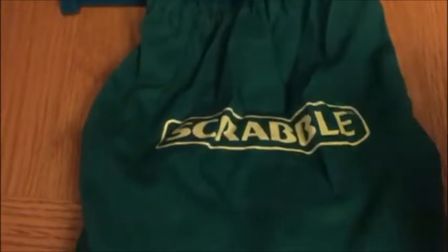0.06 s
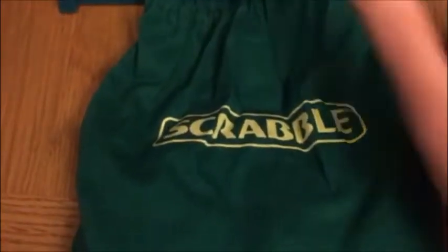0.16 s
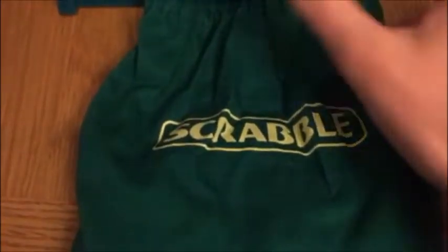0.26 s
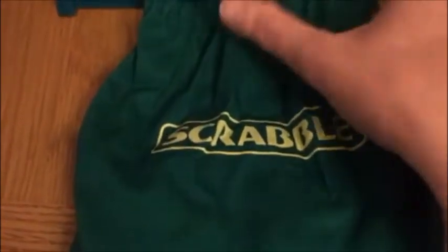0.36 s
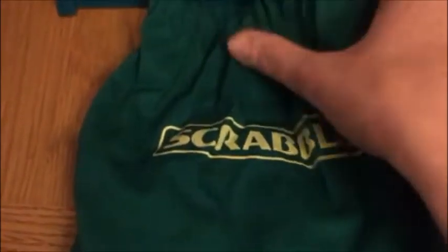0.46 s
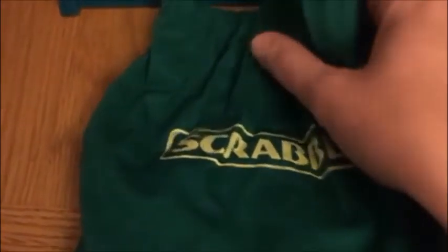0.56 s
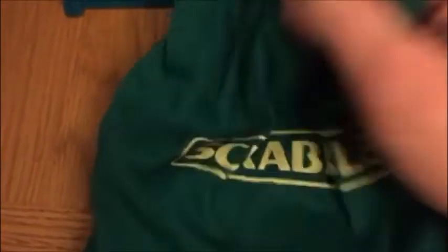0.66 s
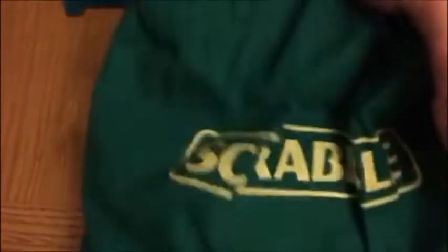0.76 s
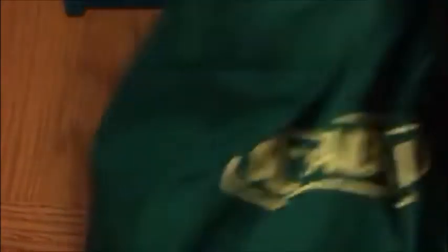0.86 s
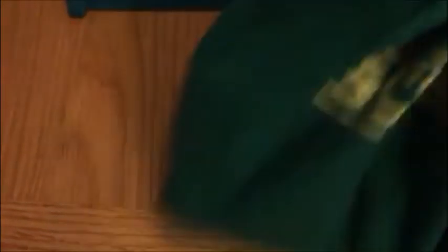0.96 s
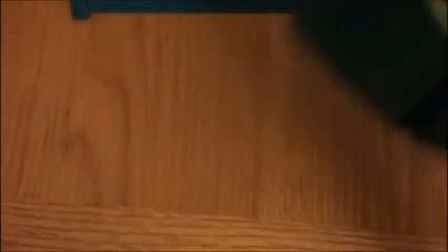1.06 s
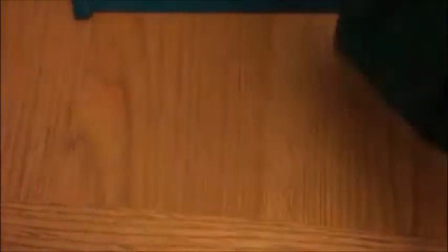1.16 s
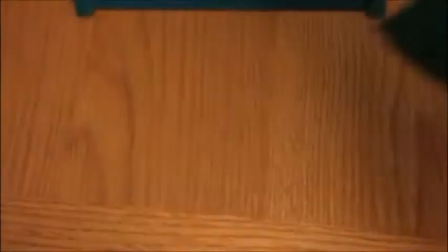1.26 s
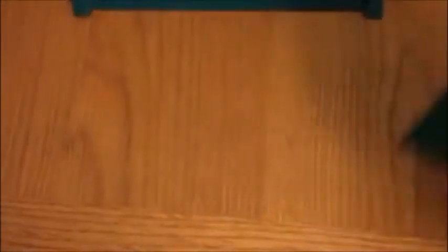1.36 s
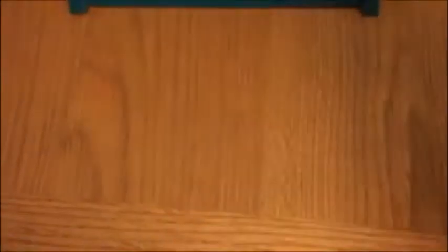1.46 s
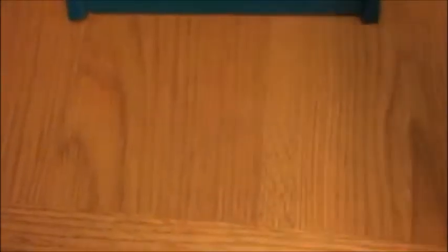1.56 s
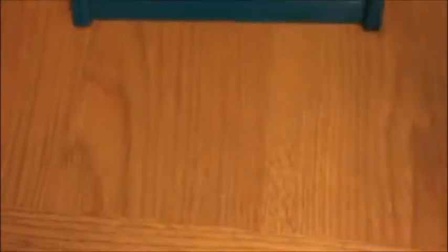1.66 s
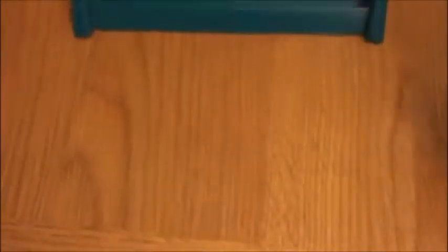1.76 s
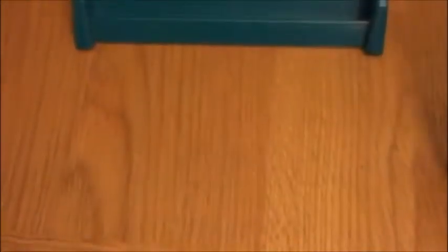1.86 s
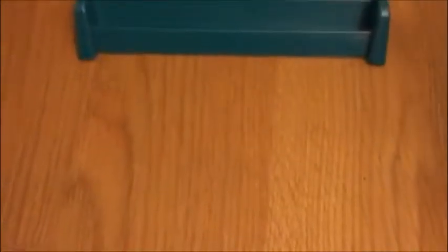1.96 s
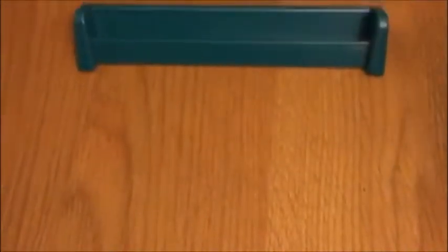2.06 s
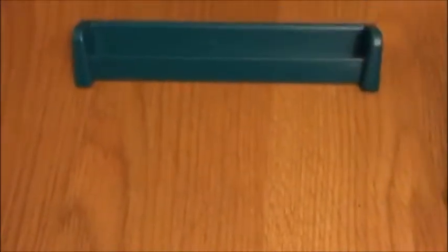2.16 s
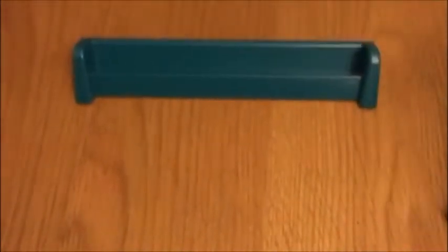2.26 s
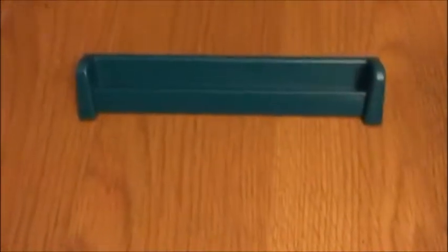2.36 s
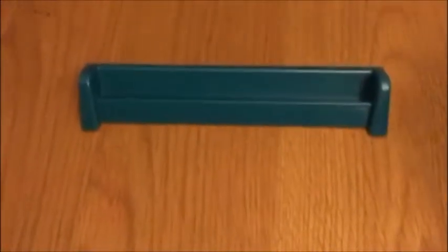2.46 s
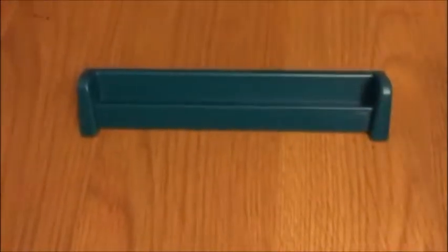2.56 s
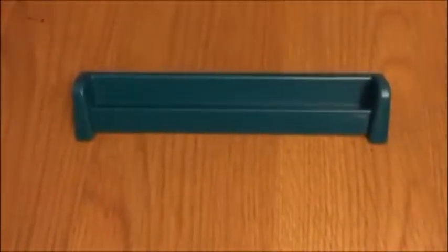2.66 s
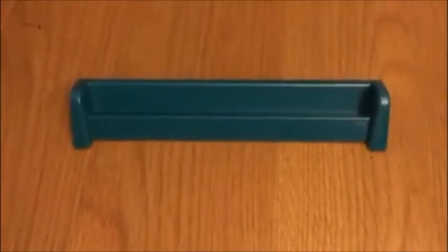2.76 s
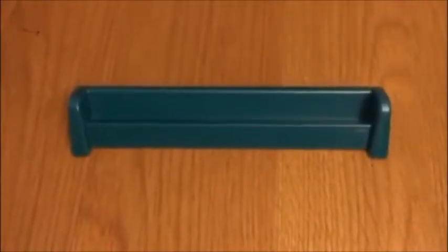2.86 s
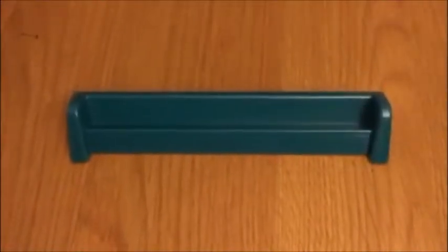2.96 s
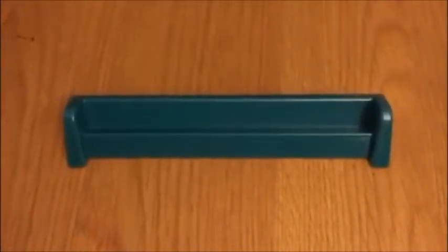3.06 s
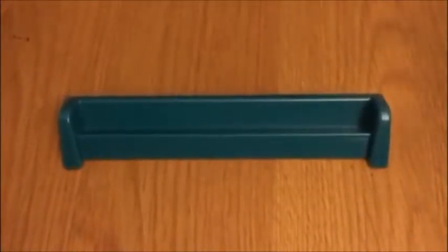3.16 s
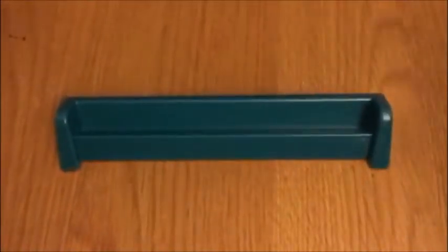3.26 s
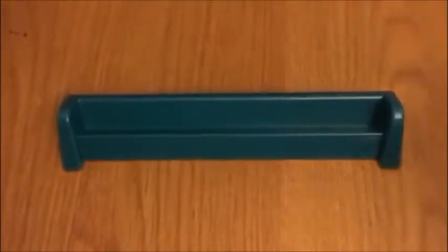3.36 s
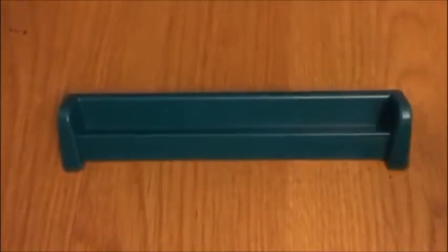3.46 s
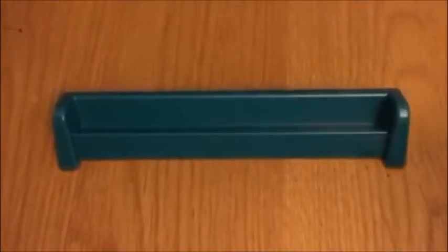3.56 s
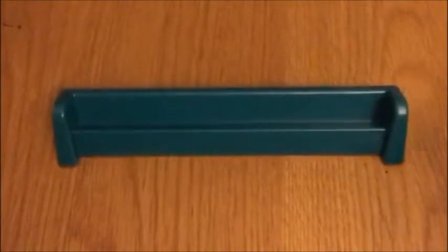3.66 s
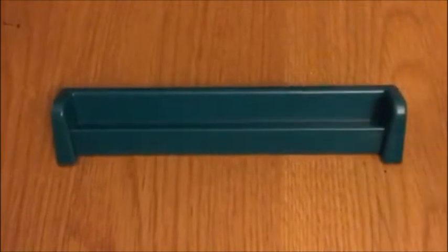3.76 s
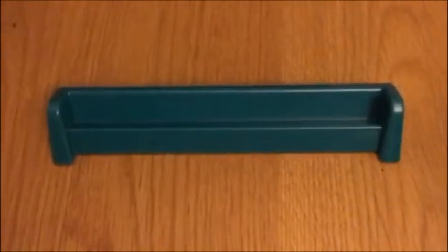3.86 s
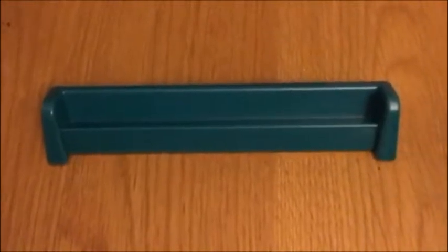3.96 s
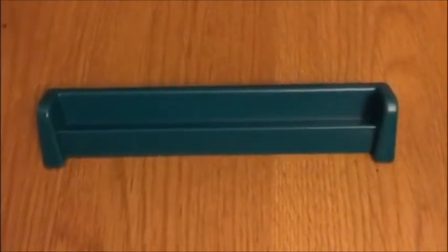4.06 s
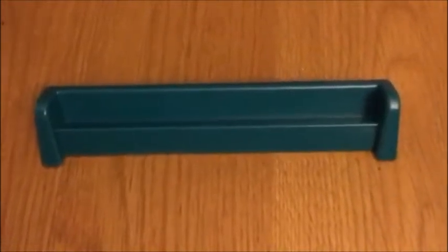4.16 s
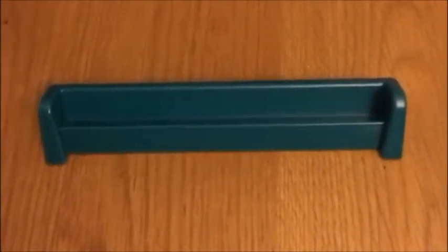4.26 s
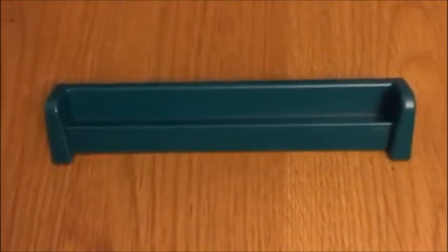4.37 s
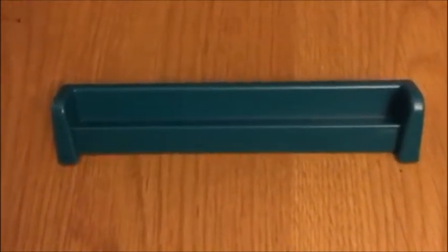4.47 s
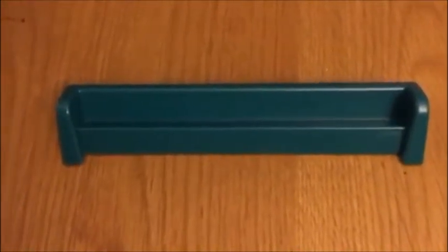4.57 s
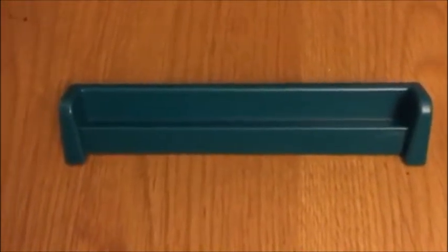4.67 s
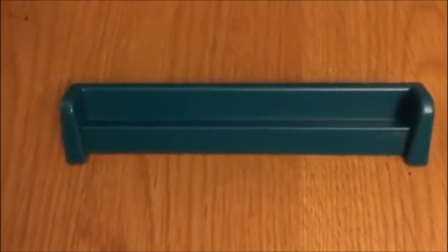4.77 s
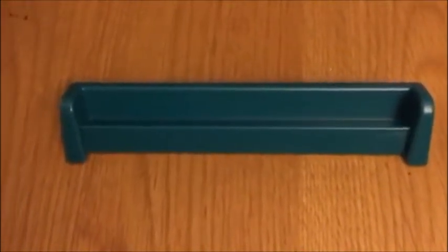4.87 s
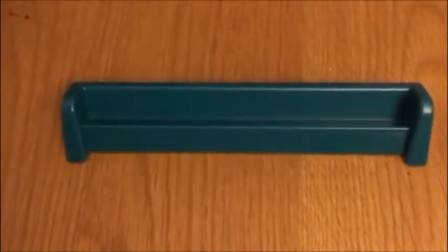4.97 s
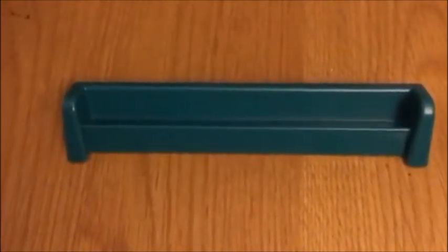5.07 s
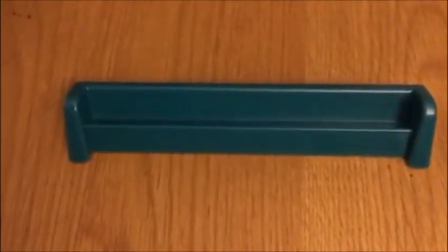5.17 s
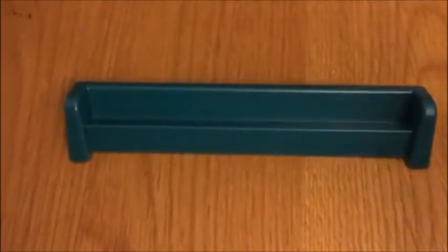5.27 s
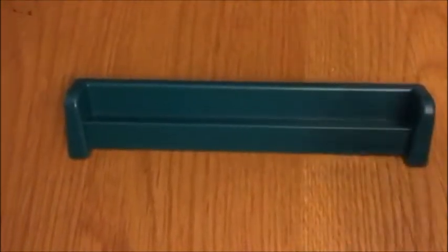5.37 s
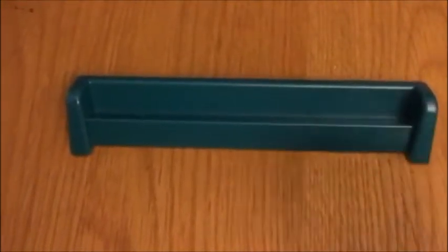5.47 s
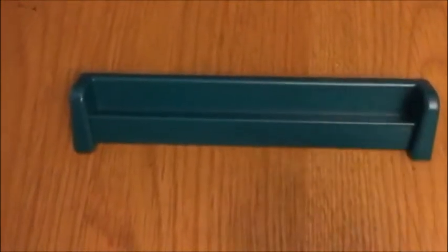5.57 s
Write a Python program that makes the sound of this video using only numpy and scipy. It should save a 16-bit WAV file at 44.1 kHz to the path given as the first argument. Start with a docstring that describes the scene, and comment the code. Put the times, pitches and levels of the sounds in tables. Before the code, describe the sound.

A small, quiet room with very faint, low steady air, heard from close by. At about 0.2 seconds a soft double bump is followed by a light hiss of cloth under a hand. From 0.75 wooden tiles begin to click in a bag, with a small cluster of crisp clacks around 1.0. From 1.25 to 1.9 the shaking is strongest: dense, bright, hard clatter in quick surges, loudest near 1.5 and again about 1.7, over low rumble, rustling fabric and dull thuds. A final knock comes near 2.0, then sparse, soft ticks until 2.9. Cloth slides again around 3.1; a second rattle rises at 3.25 and peaks with a sharp knock at 3.4. Looser, quieter groups of clacks follow near 3.9, 4.05, 4.3 and 4.6, thinning by 4.9. A low, soft thump at 5.1 and faint cloth close it. Echoes are short and dry.

```python
"""Bag of wooden game tiles

A cloth bag of tiles is picked up from a table and jostled in two spells, heard from close by.
Single clacks, each a knock with short rings, stand out of a clatter of many tiny collisions.
The clatter swells and settles with each shake, denser and harder at its height.
Shaped noise makes the rumbling heap, rustling cloth and sliding hiss; noise bursts and booms make the thuds.
A small quiet room answers with a table echo and a short tail, over faint steady air."""
import sys
import numpy as np
from scipy import signal
from scipy.fft import rfft, irfft
from scipy.io import wavfile
from scipy.ndimage import uniform_filter1d

SR = 44100
rng = np.random.default_rng(int(sys.argv[2]) if len(sys.argv) > 2 else 0)


def persist_wave(psi):
    """Save psi, clipped to +-1, as 16-bit WAV."""
    counts = np.round(np.clip(psi, -1, 1) * 32767).astype(np.int16)
    wavfile.write(sys.argv[1], SR, np.atleast_2d(counts).T)


N = 247180  # length in samples
HZ = np.fft.rfftfreq(N, 1 / SR)
TIME = np.arange(N) / SR
CLACK_TIME = np.arange(2048) / SR
ATTACK = round(.004 * SR)  # samples at the start of a clack that set its level


def gain_of(db):
    """Turns decibels into amplitude."""
    return 10 ** (np.asarray(db) / 20)


def evened(x, size=None):
    """Scales a sound to rms 1, over all of it or over its first samples."""
    return x / np.sqrt(np.mean(x[:size] ** 2) + 1e-20)


def read(points, hz):
    """Reads a curve between its points, on a log-frequency axis."""
    f, value = np.transpose(points)
    return np.interp(np.log(hz + 1), np.log(f), value)


def add(mix, s, sound):
    """Adds a sound into the mix at a time in seconds."""
    part = mix[round(s * SR):][:len(sound)]
    part += sound[:len(part)]


def coloured(x, points):
    """Filters to the given spectrum without smearing backwards in time, so that attacks stay sharp."""
    log_gain = np.log(gain_of(read(points, abs(np.fft.fftfreq(N, 1 / SR)))))
    response = np.exp(np.conj(signal.hilbert(log_gain)))  # gain with its minimum phase
    return irfft(rfft(x) * response[:len(HZ)], N)


def burst(t, hz, decay, spread):
    """A short shudder of noise in one broad resonance."""
    edges = np.clip([hz / (1 + spread), hz * (1 + spread)], 20, .45 * SR)
    b, a = signal.butter(1, edges, "band", fs=SR)
    return signal.lfilter(b, a, rng.standard_normal(len(t)) * np.exp(-t / decay))


def swells(rows, drop_db, roundness=1.25):
    """Level in dB of movements that build up, peak and settle; overlapping ones add in power."""
    power = np.full(N, 1e-16)
    for s, db, build, settle in rows:
        away = np.maximum((s - TIME) / build, (TIME - s) / settle)
        near = abs(away) < 4
        # down by drop_db one build-up before or one settling after; roundness above 1 rounds the top
        power[near] += gain_of(db - drop_db * abs(away[near]) ** roundness) ** 2
    return 10 * np.log10(power)


# Spectrum of the air in the room. Each row: frequency in Hz, relative level in dB per Hz.
ROOM_AIR = [(25, -13.5), (60, -3.5), (105, 0), (150, -4.5), (300, -7), (550, -12), (1300, -11.5),
            (2200, -19), (4000, -27.5), (16000, -34.5)]


def room_air(level_db=-70.5):
    """Steady noise, strongest in the bass, is the faint air of the room."""
    return gain_of(level_db) * evened(coloured(rng.standard_normal(N), ROOM_AIR))


# Cloth slides under the hand.
# Each row: time of its height in seconds, hiss level in dB, build-up in seconds, settling in seconds.
SLIDES = [(0.61, -68.5, 0.24, 0.63), (3.07, -72, 0.2, 0.32), (3.72, -77, 0.13, 0.36),
          (5.15, -79.5, .6, 0.28)]
# Spectrum of the hiss of sliding cloth. Each row: frequency in Hz, relative level in dB per Hz.
HISS = [(500, -9.5), (2500, 4), (7000, -9.5), (15000, -7.5)]


def slides(drop_db=20):
    """The soft, even hiss of cloth sliding under the hand."""
    return gain_of(swells(SLIDES, drop_db)) * evened(coloured(rng.standard_normal(N), HISS))


# Shakes, each a surge of the heap. Each row: time of its height in seconds, clatter in dB, rumble in dB
# (both before trims), build-up in seconds, settling in seconds.
SHAKES = [(0.774, -42, -57, 0.081, 0.16), (0.986, -40, -57.5, 0.072, 0.042),
          (1.041, -39.5, -58.5, 0.033, .051), (1.226, -47.5, -63, 0.13, 0.12),
          (1.264, -28.5, -51, .04, .036), (1.426, -30, -49.5, 0.044, 0.088),
          (1.479, -21, -47.5, 0.025, 0.044), (1.63, -26, -65.5, 0.031, 0.061),
          (1.698, -24, -62, 0.048, 0.078), (1.866, -33, -57.5, 0.081, 0.05), (1.98, -43, -55.5, 0.02, 0.11),
          (2.236, -55, -64.5, 0.077, 0.29), (2.632, -53, -59, 0.088, 0.27), (2.741, -53.5, -82, 0.095, 0.4),
          (3.219, -46, -54, 0.11, 0.088), (3.262, -32, -49, 0.037, 0.11), (3.396, -27.5, -55, 0.014, 0.052),
          (3.430, -35, -56.5, 0.038, 0.13), (3.611, -49.5, -59.5, 0.055, .1),
          (3.804, -49, -55.5, 0.11, 0.072), (3.905, -48.5, -57, 0.12, 0.18),
          (4.037, -43.5, -56, 0.038, 0.044), (4.089, -40, -55.5, 0.023, 0.099),
          (4.177, -45, -57.5, 0.061, 0.15), (4.342, -37, -53, 0.027, 0.084),
          (4.580, -45, -59.5, 0.071, .11), (4.819, -58.5, -62.5, 0.016, 0.11)]
# The hand pushes the bag about with hardly a tile moving.
# Each row: time of its height in seconds, rumble in dB before trim, build-up in seconds, settling in seconds.
PUSHES = [(0.715, -63.5, 0.11, 0.099), (0.885, -57.5, 0.045, 0.19), (5.150, -70.5, 0.2, 0.16),
          (5.570, -75.5, .02, .08)]


def motion(heap_db=-2, uneven_db=1.5, size=500, clatter_drop_db=20, rumble_drop_db=13):
    """Clatter and rumble levels: each shake drives both, the rumble more broadly; a push only rumbles."""
    tiles = [(s, db, build, settle) for s, db, _, build, settle in SHAKES]
    heap = [(s, db + heap_db, build, settle) for s, _, db, build, settle in SHAKES]
    # tiles jam and let go in small groups
    slips_db = uneven_db * evened(uniform_filter1d(rng.standard_normal(N), size))
    clatter_db = swells(tiles, clatter_drop_db) + slips_db
    return clatter_db, swells(heap + list(PUSHES), rumble_drop_db)


def rubbing(spectrum, size):
    """Noise that catches and slips in lumps some samples long."""
    lumps = gain_of(3.5 * evened(uniform_filter1d(rng.standard_normal(N), size)))
    return evened(coloured(rng.standard_normal(N) * lumps, spectrum))


# Spectrum of the rumbling heap. Each row: frequency in Hz, relative level in dB per Hz.
BAG = [(25, -23.5), (55, -3.5), (100, -3), (200, 1), (330, -6.5), (600, -13.5), (1100, -10), (2200, -32)]
# Spectrum of the rustling cloth. Each row: frequency in Hz, relative level in dB per Hz.
CLOTH = [(300, -5), (1100, -1.5), (2500, 9), (6000, -11.5), (16000, -35.5)]


def bag(clatter_db, rumble_db):
    """The shifting heap rumbles, and the cloth rustles around it."""
    rumble = gain_of(rumble_db + 2.5) * rubbing(BAG, size=400)
    rustle_db = 0.61 * rumble_db + 0.33 * clatter_db - 4.0  # the cloth follows both
    return rumble + gain_of(rustle_db) * rubbing(CLOTH, size=150)


# Dull blows of the hand and the heap.
# Each row: start in seconds, level in dB, pitch in Hz, decay time in seconds (to fall to about a third).
THUDS = [(0.2115, -65.5, 1400, 0.0065), (0.213, -55, 217, 0.0095), (0.230, -65, 1400, 0.015),
         (0.231, -58, 214, 0.024), (0.893, -40.5, 112, 0.0035), (1.263, -47, 134, 0.013),
         (1.463, -41.5, 109, 0.016), (1.692, -43.5, 158, 0.026), (1.742, -48.5, 186, 0.014),
         (1.856, -52.5, 130, 0.01), (1.969, -38.5, 450, 0.0056), (2.263, -50.5, 143, 0.013),
         (2.921, -60, 750, 0.022), (3.392, -33, 1340, 0.0089), (3.394, -38, 270, 0.006),
         (3.449, -46, 142, 0.011), (4.100, -51, 128, 0.012), (4.318, -40, 1064, 0.0023),
         (4.378, -48.5, 306, 0.008), (5.128, -57.5, 120, 0.078)]


def thuds(boom_hz=160):
    """The heap lands in the cloth, or a hand bumps the bag; the lowest blows boom."""
    out, t = np.zeros(N), np.arange(SR // 3) / SR
    for s, db, hz, decay in THUDS:
        blow = burst(t, hz, decay, spread=.7)
        blow = signal.lfilter(*signal.butter(2, 2.4 * hz, fs=SR), blow)  # takes off the treble
        boom = np.sin(2 * np.pi * hz * t) * np.exp(-t / decay)
        thud = evened(blow) + (boom_hz / hz) ** 2 * evened(boom)
        add(out, s, gain_of(db) * evened(thud, round(decay * SR)))
    return out


# The three rings of a tile. Each: pitch in Hz before detuning, time in seconds to fall by 60 dB.
HIGH_RING, LOW_RING, TOP_RING = (8200, 0.057), (7060, 0.048), (12220, 0.014)


def ring(hz, t60, detune=.014):
    """One mode of two colliding tiles, each tuned a little differently."""
    tiles = hz * (1 + detune * rng.standard_normal((2, 1)))
    first, second = np.sin(2 * np.pi * tiles * CLACK_TIME)
    return evened((first + .5 * second) * gain_of(-60 * CLACK_TIME / t60), ATTACK)


def damped(hz, decay):
    """A few dying modes, struck with random strength and sign; the higher ones die sooner."""
    fading = np.exp(-np.outer((hz / hz[0]) ** 0.24, CLACK_TIME) / decay)
    modes = np.sin(2 * np.pi * np.outer(hz, CLACK_TIME)) * fading
    return rng.standard_normal(len(hz)) @ modes


def clack(knock_db, hz, edge_db, cycles=0.69, crack=0.0012, crack_db=-3, shudder_db=-2, rebound_db=-7,
          high_db=-12, low_db=-8, ring_slope_db=19):
    """A knock and its quick rebound, the shudder of the neighbouring tiles, and the tile's rings."""
    turns = hz * CLACK_TIME
    # the pile damps the tap within a few cycles
    tap = evened(turns * np.exp(-turns / cycles) * np.sin(2 * np.pi * turns), ATTACK)

    pitches = np.geomspace(np.sqrt(hz * 900), LOW_RING[0], 12) * rng.uniform(.88, 1.1, 12)
    neighbours = damped(pitches, decay=.003)
    neighbours *= 1 - np.exp(-turns / 2)  # the blow takes a moment to spread through the pile
    # a dull knock excites the low ones
    neighbours = signal.lfilter(*signal.butter(1, min(1.7 * hz, SR / 3), fs=SR), neighbours)
    knock = tap + gain_of(shudder_db) * evened(neighbours, ATTACK)
    add(knock, rng.uniform(0.0014, .005), gain_of(rebound_db) * tap)

    rings = 0
    for db, (ring_hz, t60) in [(high_db, HIGH_RING), (low_db, LOW_RING)]:
        # a knock wakes the rings near its own pitch: they weaken with each octave away
        ring_db = db - ring_slope_db * abs(np.log2(hz / ring_hz))
        rings = rings + gain_of(ring_db) * ring(ring_hz, t60)

    # hard edges crack and ring high
    edge = ring(*TOP_RING)
    edge = edge + gain_of(crack_db) * evened(burst(CLACK_TIME, 8100, crack, spread=0.42), ATTACK)
    return gain_of(knock_db) * (evened(knock, ATTACK) + rings) + gain_of(edge_db) * edge


def clatter(level_db, count=80, trim_db=-2):
    """Countless small collisions: a stronger shake makes them denser, harder and brighter."""
    vigour = np.clip(1 + (level_db + 22) / 45, 0, 1)
    hit = rng.random(N) < (220 + 2400 * vigour ** 8) / SR  # hits per second, as a chance per sample

    # sizes vary less in a strong shake
    spread_db = 5 - 1.8 * vigour ** 4
    size = hit * gain_of(spread_db * np.clip(rng.standard_normal(N), -2, 1.7))
    # neighbours share the energy of the shake
    shared = uniform_filter1d(uniform_filter1d(size ** 2, size=800), size=400)
    size *= gain_of(level_db + trim_db) / np.sqrt(abs(shared) + 1e-4) * rng.choice([-1, 1], N)

    # each hit picks one of the ready-made clacks, from soft to hard
    hardness = .24 + .56 * vigour ** 2 + .17 * rng.standard_normal(N)
    kind = np.clip(np.round(count * hardness), 0, count - 1)
    out = np.zeros(N)
    for k, hard in enumerate(np.linspace(0, 1, count)):
        hz = min(2200 * (1 + 1.78 * hard) * np.exp(.18 * rng.standard_normal()), LOW_RING[0])
        grain = clack(0, hz, edge_db=-31 + 29.6 * hard)
        grain /= np.linalg.norm(grain)
        for at in np.flatnonzero(hit & (kind == k)):
            add(out, at / SR, size[at] * grain)
    return out


# Hard clacks that stand out of the clatter.
# Each row: start in seconds, knock level in dB, pitch of the knock in Hz, bright edge level in dB.
CLACKS = [(0.741, -39, 4900, -51.5), (0.769, -42, 4950, -56), (0.784, -39.5, 6400, -63),
          (0.823, -40, 2460, -55), (0.917, -45.5, 6440, -63), (0.9484, -37.5, 5500, -51),
          (0.9573, -36.5, 5630, -56), (0.9829, -33.5, 4200, -58), (0.993, -32, 3730, -38),
          (1.0208, -33.5, 5260, -67), (1.032, -35.5, 4400, -39.5), (1.0425, -38.5, 4300, -50),
          (1.260, -28, 4360, -47.5), (1.370, -50, 3870, -52), (1.4069, -47, 4870, -31.5),
          (1.422, -29.5, 5840, -34), (1.462, -26, 5140, -35), (1.4813, -23.5, 5300, -24.5),
          (1.6207, -29.5, 6450, -43), (1.6394, -39, 5200, -42), (1.8704, -36, 5300, -41),
          (1.878, -34, 5700, -37.5), (1.941, -44, 4870, -72), (1.9688, -32.5, 3570, -35),
          (2.204, -40.5, 3340, -58.5), (2.377, -45, 3780, -71), (2.4244, -44, 4480, -57.5),
          (2.606, -45.5, 3930, -70), (2.622, -44.5, 3950, -77), (2.668, -42.5, 3900, -60),
          (2.7173, -46, 5840, -60), (2.8614, -45, 4300, -61.5), (3.145, -48.5, 3860, -74),
          (3.3715, -40.5, 6400, -47), (3.392, -27.5, 5540, -39), (3.3997, -32.5, 3820, -31.5),
          (3.471, -38.5, 4050, -42.5), (3.495, -43, 3790, -51), (3.798, -37.5, 3930, -58),
          (3.837, -40, 2700, -84), (3.876, -38.5, 2560, -77), (3.922, -41, 4100, -78),
          (3.9553, -40, 3900, -59), (4.021, -45.5, 4300, -58), (4.0429, -34, 4430, -48),
          (4.195, -40, 2330, -57), (4.249, -36.5, 3380, -39), (4.254, -37, 3270, -62),
          (4.318, -37.5, 4340, -52), (4.325, -33.5, 4250, -52), (4.352, -39, 5100, -47),
          (4.523, -42.5, 4070, -58), (4.54, -41.5, 4600, -62), (4.565, -41, 3670, -61),
          (4.575, -39.5, 4040, -53), (4.595, -39, 4700, -47.5), (4.634, -44.5, 5500, -56),
          (4.666, -50, 4220, -67), (4.726, -56, 2650, -88.5), (4.805, -49, 3680, -49),
          (4.809, -51, 7060, -54), (4.8777, -49.5, 3250, -72.5), (5.016, -69, 4500, -89.5)]


def clacks():
    """The hard single collisions of tile on tile."""
    out = np.zeros(N)
    for s, knock_db, hz, edge_db in CLACKS:
        add(out, s, clack(knock_db, hz, edge_db))
    return out


# How long the room rings. Each row: frequency in Hz, time in seconds to fall by 60 dB.
ROOM = [(250, 0.22), (2500, 0.18), (7000, 0.2), (13000, 0.083)]


def room(x, wet_db=-10, table_db=-11, table_delay=.0031, onset=0.0026):
    """One echo off the table, then a diffuse tail that dies soonest in the top treble; delays in seconds."""
    taps = rng.standard_normal(SR // 2) * (rng.random(SR // 2) < 4000 / SR)  # about 4000 echoes a second
    hz, t, z = signal.stft(taps, SR, nperseg=256)
    fading = gain_of(-60 * t / read(ROOM, hz)[:, None])
    tail = signal.istft(z * fading, SR, nperseg=256)[1]
    tail *= np.clip(np.arange(len(tail)) / SR / onset - .5, 0, 1)  # a short fade-in
    tail *= gain_of(wet_db) / np.linalg.norm(tail)
    tail[round(table_delay * SR)] += gain_of(table_db)
    return x + signal.fftconvolve(x, tail)[:N]


# Colour of cloth and microphone. Each row: frequency in Hz, gain in dB.
COLOUR = [(300, -0.5), (750, -2), (1050, 5), (1400, 1), (2100, -0.5), (3000, -1), (5500, 2), (7200, 5),
          (8200, 4.5), (10500, 1.5), (13000, 1.5), (16000, -3)]


def scene():
    """Tiles and bag, coloured by cloth and microphone, in the room and over its faint steady air."""
    clatter_db, rumble_db = motion()
    tiles = clatter(clatter_db) + clacks()
    near = coloured(tiles + thuds() + bag(clatter_db, rumble_db) + slides(), COLOUR)
    return (room(near) + room_air())[None]


def record(dry):
    """The recorder cuts the deepest bass, below 40 Hz, and the top, above 16200 Hz."""
    dry = signal.lfilter(*signal.butter(3, 40, "high", fs=SR), dry)
    top_cut = signal.firwin(511, 16200, window=("kaiser", 9), fs=SR)
    return signal.oaconvolve(dry, top_cut[None], "same")


dry = scene()
out = record(dry)
persist_wave(out)
```